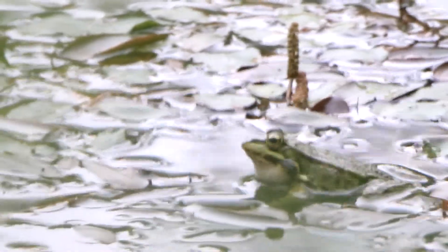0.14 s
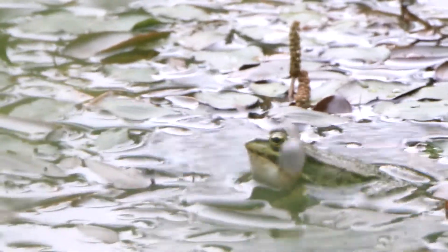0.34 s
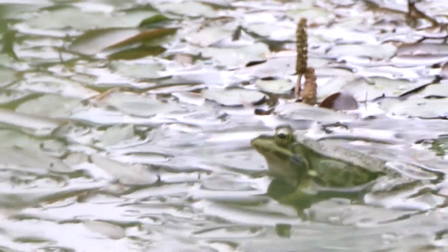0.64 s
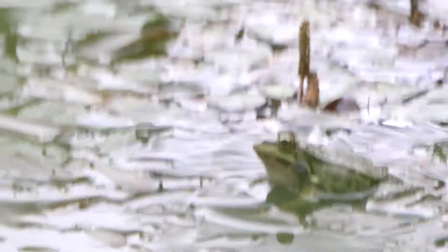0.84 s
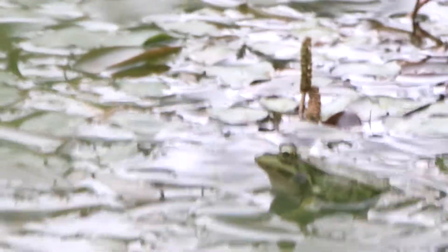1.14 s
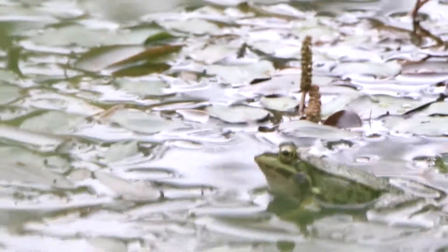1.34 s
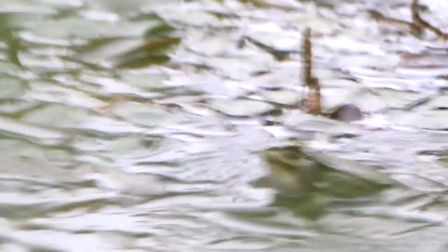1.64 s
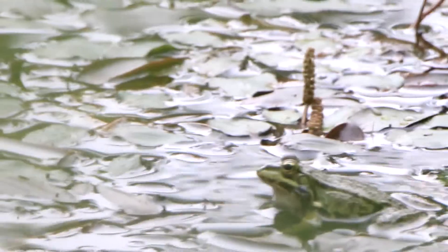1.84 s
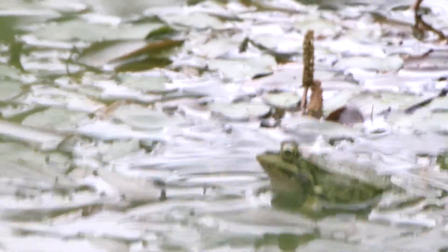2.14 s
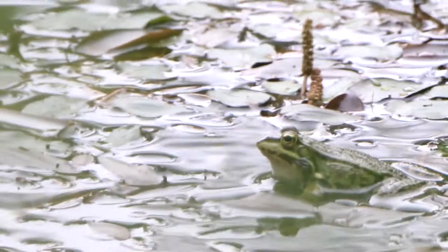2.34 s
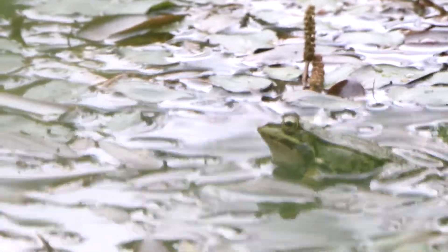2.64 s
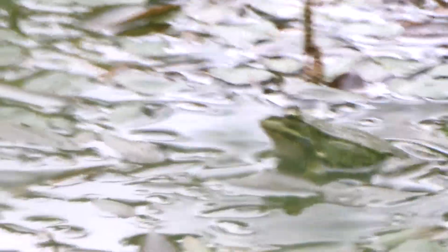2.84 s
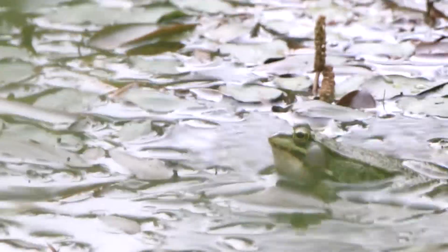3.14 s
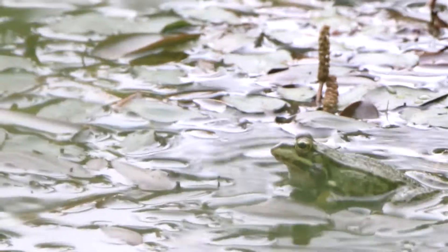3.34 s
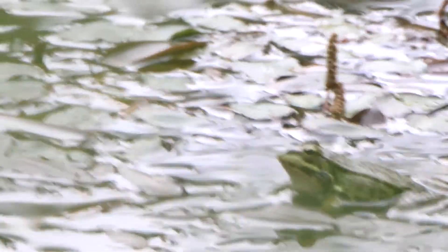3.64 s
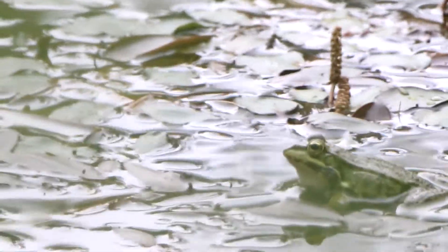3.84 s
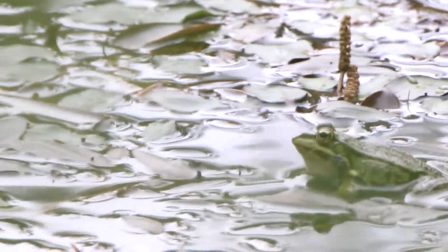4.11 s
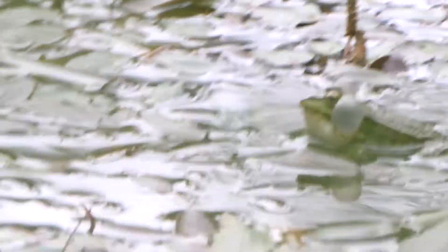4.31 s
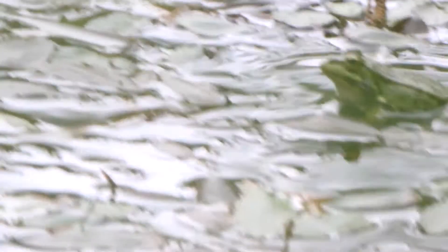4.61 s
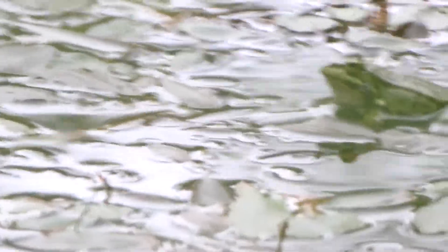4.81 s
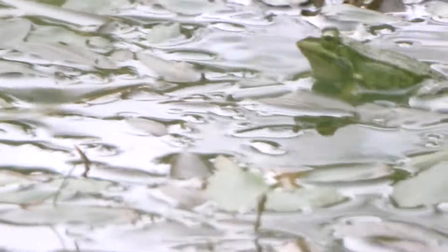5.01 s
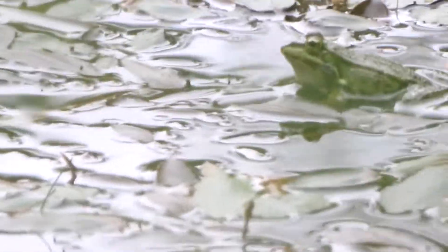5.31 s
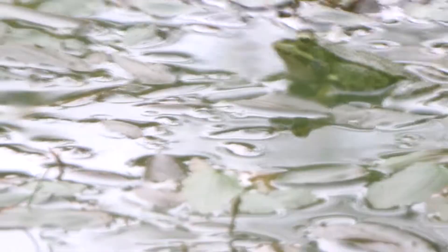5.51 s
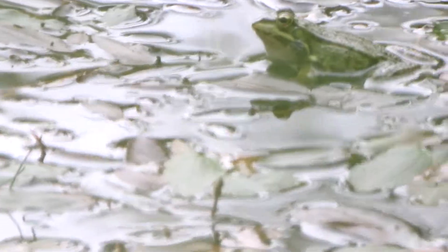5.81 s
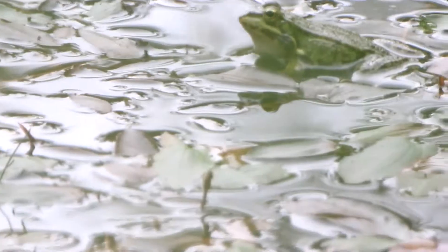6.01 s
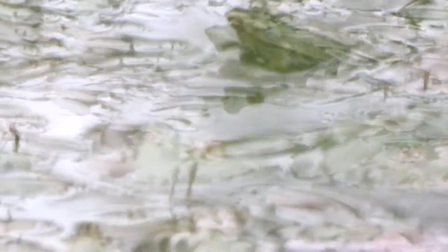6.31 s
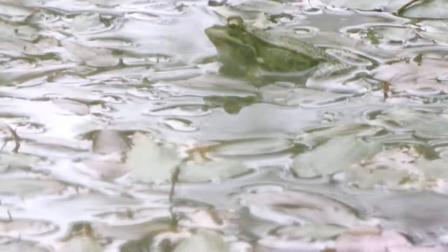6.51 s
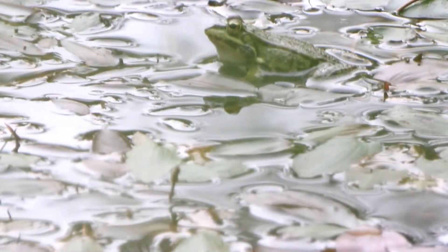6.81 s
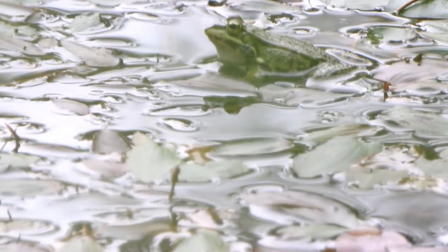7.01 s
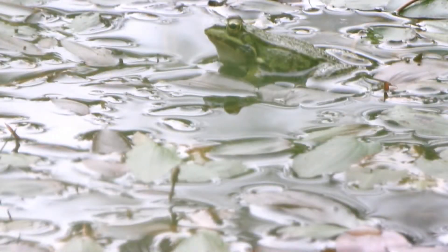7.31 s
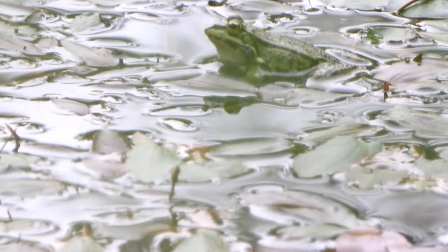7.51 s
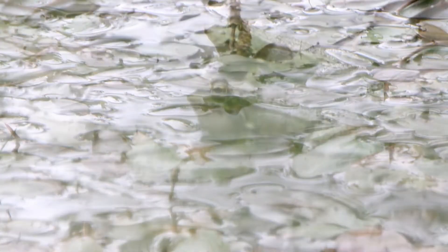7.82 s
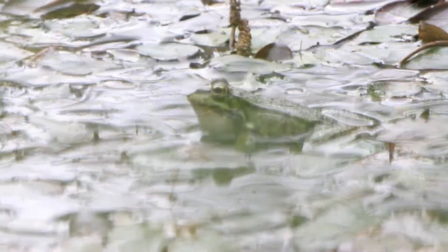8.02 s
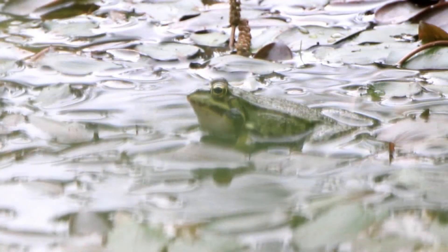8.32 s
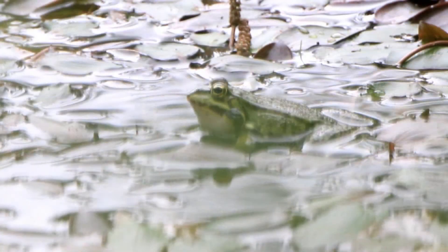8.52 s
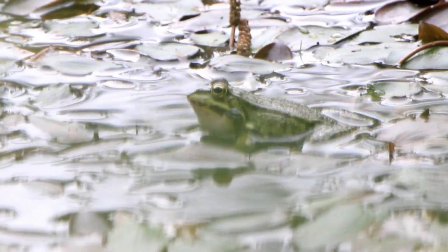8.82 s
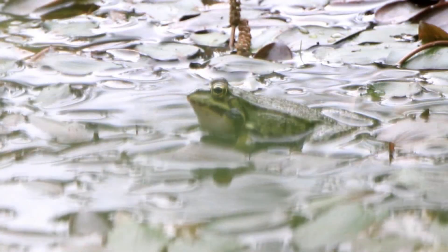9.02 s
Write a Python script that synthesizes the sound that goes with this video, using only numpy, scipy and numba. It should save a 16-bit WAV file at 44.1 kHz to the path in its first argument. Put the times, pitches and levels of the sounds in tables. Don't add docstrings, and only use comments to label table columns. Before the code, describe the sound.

Many green frogs call over each other without pause, fast dry rattles, creaky croaks and short throaty grunts, over a very faint outdoor rumble.

```python
import sys
import numpy as np
from scipy import signal
from scipy.fft import rfft, irfft
from scipy.io import wavfile
from scipy.ndimage import uniform_filter1d
from numba import njit

SR = 44100
rng = np.random.default_rng(int(sys.argv[2]) if len(sys.argv) > 2 else 0)


def generate_wav(signal):
    frames = np.transpose(np.atleast_2d(signal))
    scaled = np.clip(frames, -1, 1) * 32767
    pcm = np.round(scaled).astype(np.int16)
    wavfile.write(sys.argv[1], SR, pcm)


def invert_db(x):
    u = np.asarray(x, float) / 20
    return 10 ** u


N = 403515

# frequency in Hz, level in dB.
AIR = [(20, -41), (60, -12.5), (135, -11.5), (300, -19), (1000, -18), (3600, -27), (8000, -36),
       (16000, -46)]
AIR_RMS_DB = -54
# frequency in Hz, left minus right in dB.
PORTS = [(60, -0.5), (290, -0.2), (850, 0.0), (1440, -0.5), (2440, -2.5), (4140, 1.0), (7030, 3.5)]
# time in seconds, high voices in dB, deep voices in dB.
FAR = [(0.0, -26, -36), (0.43, -21.5, -45.5), (0.61, -34.5, -38), (1.42, -31.5, -48), (1.6, -27.5, -40),
       (1.99, -28, -53), (2.16, -20, -41), (3.1, -28.5, -35), (3.29, -23, -40.5), (4.08, -31, -46),
       (5.12, -28.5, -41), (5.53, -32, -44.5), (6.34, -31.5, -40), (6.93, -27.5, -48.5),
       (7.26, -29.5, -39.5), (7.59, -25.5, -47.5), (8.4, -35.5, -45.5), (9.15, -32.5, -49.5)]
# time in seconds, peak in dB.
TICKS = [
    (3.9762, -42.5),
    (5.0197, -37),
    (5.355, -48.5),
    (5.617, -44),
    (5.768, -52),
    (5.811, -40),
    (5.8185, -43),
    (8.141, -39),
]
# start in seconds, peak in dB.
GRUNTS = [(0.024, -20.5), (0.331, -21.5), (1.21, -29), (1.619, -22), (1.657, -21), (2.261, -29),
          (2.306, -32), (3.155, -32), (3.193, -20), (3.333, -27.5), (3.754, -24), (4.442, -21),
          (4.521, -26), (4.688, -33), (5.726, -19.5), (6.147, -28), (6.639, -34.5), (7.097, -33),
          (7.878, -28), (7.959, -35), (8.277, -24), (8.659, -23), (8.817, -31)]
# first in seconds, last in seconds, peak in dB.
GRUNT_RUNS = [
    (0.673, 0.958, -29.5),
    (5.013, 5.262, -32),
    (5.836, 6.023, -48),
    (6.204, 6.359, -35),
]
GRUNT_GAP_S = .034
# start in seconds, end in seconds, first Hz, last Hz, level in dB.
CROAKS = [(-.05, 0.16, 1830, 1870, -22.5), (1.973, 2.216, 1620, 1790, -22.5),
          (2.719, 2.891, 1780, 1820, -25.5), (3.282, 3.466, 1610, 1770, -27),
          (3.734, 3.883, 2090, 1630, -28), (4.017, 4.136, 1760, 2050, -25.5),
          (4.752, 5.007, 1290, 1800, -33), (5.188, 5.316, 1860, 1830, -24.5),
          (5.676, 5.795, 1480, 1810, -24), (6.039, 6.215, 1780, 1800, -29.5),
          (6.418, 6.573, 1430, 1960, -29), (6.837, 6.969, 1600, 1950, -32.5),
          (7.372, 7.425, 1940, 2370, -22), (7.837, 7.99, 1700, 2050, -30), (8.245, 8.332, 1340, 1740, -24),
          (8.407, 8.481, 1940, 2070, -35.5), (2.96, 3.086, 1870, 1710, -38),
          (8.647, 8.741, 1980, 2070, -26.5), (8.99, 9.207, 1230, 1830, -26)]
# start in seconds, end in seconds, first Hz, last Hz, level in dB.
RINGING_CROAKS = [
    (0.318, 0.484, 1300, 2100, -20.5),
    (1.054, 1.324, 1740, 1976, -27),
    (1.479, 1.789, 1200, 2050, -23.5),
    (3.1, 3.253, 1140, 2170, -23),
    (4.316, 4.487, 1195, 2050, -20),
    (4.455, 4.529, 1560, 2170, -21),
]
CROAK_HEAD_HZ, CROAK_HEAD_DB, PLAIN_HEAD_DB = (6300, 5370), -18.5, -26.5
THROB_S, THROB_DB = .035, 4

# first burst in seconds, last burst in seconds,
# level in dB, full sac in Hz, head ring relative to the sac in dB.
BRIGHT = [
    (-.131, .342, -23, 2430, -9.5),
    (1.203, 1.63, -27.5, 2720, -6),
    (3.218, 3.662, -28, 2506, -8),
    (7.494, 7.93, -26, 2520, -8),
    (8.499, 9.066, -26.5, 2617, -7.5),
]
BIG = [
    (4.796, 5.177, -28, 2280, -10.5),
    (6.92, 7.39, -20, 2433, -11),
]
MELLOW = [
    (2.288, 2.52, -33.5, 2840, -10.5),
    (5.244, 5.528, -30.5, 2120, -13.5),
    (6.45, 6.82, -25, 2190, -15),
    (7.956, 8.388, -23, 2440, -12.5),
]
SLOW = [(2.563, 2.931, -25, 2070, -18.5)]
SMALL = [
    (1.346, 1.83, -43, 3050, 0),
    (4.428, 4.938, -34.5, 2790, -10),
    (6.914, 7.584, -42, 2880, -3),
]
LAZY = [(5.97, 6.454, -31.5, 2660, -16.5)]
QUICK = [
    (.36, .633, -24.5, 2260, -9),
    (1.856, 2.266, -29, 2690, -10.5),
    (3.554, 3.694, -29, 2170, -8.5),
    (3.975, 4.251, -29, 2540, -10.5),
    (5.568, 5.972, -34.5, 2550, -16),
]
LOW = [
    (.135, .325, -31, 1750, -40),
    (1.52, 1.906, -34.5, 1570, -46),
    (2.05, 2.518, -30.5, 1870, -11),
    (4.616, 4.9, -33, 1540, -32),
    (5.684, 5.822, -29, 1940, -36),
]
LOW_QUICK = [
    (6.21, 6.408, -30, 1310, -42),
    (7.428, 7.714, -33, 1690, -41),
    (.78, .965, -46, 1600, -44),
]
HIGH = [
    (.258, .345, -32.5, 2020, 0),
    (3.11, 3.24, -35, 2110, -10),
]
THIN = [(5.995, 6.24, -34.5, 2880, -11)]
EARLY = [(1.076, 1.248, -27, 2400, -9)]
# calls, burst gap in seconds, slowing 0-1, empty sac share of full pitch,
# head first Hz, head last Hz.
FROGS = [(BRIGHT, .0435, .04, .85, 5230, 4900), (BIG, .0472, .04, .78, 5500, 5000),
         (MELLOW, .047, .03, .86, 6050, 5450), (SLOW, .0527, .0, .9, 5950, 5400),
         (SMALL, .0396, .03, .95, 7450, 6880), (LAZY, .0484, .06, .9, 6130, 5750),
         (HIGH, .032, .05, .9, 7700, 6700), (THIN, .04, .03, .95, 7800, 7200),
         (EARLY, .0343, .12, .9, 5450, 5950), (QUICK, .0343, .13, .85, 6520, 5950),
         (LOW, .0473, .07, .88, 4250, 4350), (LOW_QUICK, .039, .1, .8, 4250, 4350)]
SAC_FULL_AT, SAC_SAG = 0.68, 0.067
SWELL_DB, SWELL_S, LAST_DB = -6.5, 0.1, -2
HEAD_SWELL_DB, HEAD_LAST_DB = -6, -2
SCATTER_DB = .8
# start in seconds, end in seconds, ring in Hz, ring t60 in seconds, level re click in dB.
FACING = [
    (7.03, 7.41, 9500, .0005, -12),
    (0, .16, 11800, .003, -32),
    (2.0, 2.28, 13000, .002, -29),
    (8.6, 8.95, 11000, .002, -33),
    (4.13, 4.26, 14000, .003, -38),
]


@njit
def ring(rows, rise_s):
    out = np.zeros((2, N))
    for s, hz, t60, left, right, lag in rows:
        for ch in range(2 if s >= 0 else 0):
            at = (s + lag * ch) * SR
            first = int(np.ceil(at))
            p = np.exp((2j * np.pi * hz - np.log(1000) / t60) / SR)
            z = p ** (first - at) * (right if ch else left)
            q = np.exp(-1 / (rise_s * SR))
            shut = q ** (first - at)
            for i in range(max(first, 0), min(N, first + int(t60 * SR))):
                out[ch, i] += z.imag * (1 - shut)
                z, shut = z * p, shut * q
    return out


def modes(s, hz, t60_s, db, lag_s):
    chance = rng.standard_normal((len(s), 3)).T
    hz = np.clip(hz + 40 * chance[0], 100, 16000)
    port_hz, port_db = np.array(PORTS).T
    pan_db = np.interp(np.log(hz), np.log(port_hz), port_db)
    db = db + 1.2 * chance[1]
    t60_s = t60_s * np.exp(.15 * chance[2])
    left, right = invert_db(db + pan_db / 2), invert_db(db - pan_db / 2)
    return np.column_stack(np.broadcast_arrays(s, hz, t60_s, left, right, lag_s))


def bursts(s, db, gap_s, count):
    chance = rng.standard_normal((len(s), count + 1))
    k = np.arange(count)
    jitter = np.exp(.08 * chance[:, :1] + .06 * chance[:, 1:])
    times = np.cumsum(gap_s * 1.14 ** (k - count + 2) * jitter, axis=1)
    times += s[:, None] - times[:, -3:-1].mean(axis=1, keepdims=True)
    swell_db = -2.6 * np.maximum(count - 3 - k, 0) ** 1.4
    return times.ravel(), (db[:, None] + swell_db).ravel(), np.repeat(np.arange(len(s)), count)


def voice(s, db, hz, lag_s, snap_db, throat_db, head_hz, head_db):
    opposite = [1, 1, 1, -1, -1, 1]
    sac_t60_s = .0095
    return np.vstack([modes(s, hz, sac_t60_s, db, lag_s),
                      modes(s, 0.66 * hz, sac_t60_s / 2, db - 10.0, lag_s),
                      modes(s, 663, .014, db + throat_db, lag_s),
                      modes(s, 4040, .003, db + snap_db, lag_s) * opposite,
                      modes(s, head_hz, .010, db + head_db, lag_s)])


def air():
    hz = np.maximum(np.arange(N // 2 + 1) * SR / N, 10)
    air_hz, air_db = np.array(AIR).T
    shape = invert_db(np.interp(np.log(hz), np.log(air_hz), air_db))
    mid, side = rfft(rng.standard_normal((2, N)))
    side = side * np.clip(.4 + hz / 9000, 0, 1)
    noise = irfft(shape * np.array([mid + side, mid - side]), N)
    return noise * invert_db(AIR_RMS_DB) / noise.std()


def echoes(near):
    t = np.arange(SR // 3) / SR
    banks = rng.standard_normal((2, len(t))) * invert_db(-60 * t / .16) * (t > .003)
    banks = signal.lfilter([1], [1, -.2], banks)
    return invert_db(-34.5) * signal.fftconvolve(near.mean(axis=0)[None], banks, axes=1)[:, :N]


def chorus():
    s, db, throat_db = np.transpose(FAR)
    near_s = calls()[0]
    rows = []
    for rate_hz, hz, size_db in (21.51, 2096, 17.9), (23.88, 1692, 12.1), (19.02, 1200, 8.8), (22.78, 2697, 4.8):
        chance = rng.standard_normal((240, 3)).T
        t = np.cumsum(np.exp(0.076 * chance[0]) / rate_hz)
        lead = near_s[np.abs(t[:, None] - near_s).argmin(axis=1)]
        t = np.where(abs(lead - t) < .028, lead + .005 * chance[0], t)
        t, click_db, k = bursts(t, size_db + 0.51 * chance[1], .0046, count=7)
        lag_s = (5.1 + 2.42 * chance[2][k]) / SR
        far_hz = hz * np.exp(0.061 * chance[2][k])
        rows.append(modes(t, far_hz, 0.0051, click_db + np.interp(t, s, db), lag_s))
    for rate_hz, hz in (26.84, 660), (22.89, 707):
        chance = rng.standard_normal((280, 2)).T
        t = np.cumsum(np.exp(0.13 * chance[0]) / rate_hz)
        t, click_db, k = bursts(t, 0.32 * chance[1], .0075, count=3)
        click_db = click_db + np.interp(t, s, throat_db) + 9.5
        rows.append(modes(t, hz, .015, click_db, 2.5 / SR))
        rows.append(modes(t, 1.7 * hz, .005, click_db, 2.5 / SR))
    return np.vstack(rows)


def water():
    age_s = np.clip(np.arange(N) / SR - 1.03, 0, .05)
    chirp = np.sin(2 * np.pi * (2800 * age_s + 26000 * age_s ** 2))
    return invert_db(-35) * chirp * np.tanh(age_s / .002) * np.exp(-(age_s / .009) ** 2)


def ticks():
    s, db = np.transpose(TICKS)
    return modes(s, 9700, 0.00083, db + 14, 0)


def grunts():
    events = list(GRUNTS)
    for first, last, db in GRUNT_RUNS:
        count = round((last - first) / GRUNT_GAP_S) + 1
        events += [(s, db) for s in np.linspace(first, last, count)]
    s, db = np.transpose(events)
    hz = 580 * np.exp(0.15 * rng.standard_normal(len(s)))
    t, click_db, k = bursts(s + 0.0037, db + 3.0, 0.0083, count=3)
    return np.vstack([modes(t, hz[k], .013, click_db, 2.5 / SR),
                      modes(t, 1100, 0.005, click_db + 4.5, 2.5 / SR),
                      modes(t, 2000, .004, click_db - 3, 2.5 / SR)])


def croaks():
    rows = []
    plain = [(*c, PLAIN_HEAD_DB) for c in CROAKS]
    ringing = [(*c, CROAK_HEAD_DB) for c in RINGING_CROAKS]
    for start, end, first_hz, last_hz, db, head_db in plain + ringing:
        chance = rng.standard_normal((120, 2)).T
        t = start + np.cumsum(np.exp(0.0862 * chance[0]) / 290)
        on = t < end
        age = (t[on] - start) / (end - start)
        swell_db = 14 * np.log10(np.sin(np.pi * age ** 1.6) + .14)
        swell_db = swell_db + 3 * uniform_filter1d(chance[1], size=4)[on]
        swell_db = swell_db + THROB_DB * np.cos(2 * np.pi * (1 - age) * (end - start) / THROB_S)
        hz = first_hz + (last_hz - first_hz) * age
        rows.append(voice(t[on], db + 10.5 + swell_db, hz, np.full(len(hz), 3.0 / SR),
                          snap_db=-29.5, throat_db=-18.5,
                          head_hz=np.interp(age, [0, 1], CROAK_HEAD_HZ),
                          head_db=head_db - 4 * (1 - age) ** 2))
    return np.vstack(rows)


def calls():
    rows = []
    for table, gap_s, slowing, empty, first_hz, last_hz in FROGS:
        for first, last, db, sac_hz, head_db in table:
            age = np.linspace(0, 1, round((last - first) / gap_s) + 1)
            s = first + (last - first) * (age + slowing * age * (age - 1))
            young = np.exp(-((s - first) / SWELL_S) ** 2)
            level_db = db + SWELL_DB * young + LAST_DB * age ** 10
            loss = np.interp(age, [0, SAC_FULL_AT, 1], [1 - empty, 0, SAC_SAG])
            most = np.where(age < SAC_FULL_AT, 1 - empty, SAC_SAG)
            sac = sac_hz * (1 - loss ** 2 / most)
            head = first_hz + (last_hz - first_hz) * age ** .7
            ring_db = head_db + HEAD_SWELL_DB * young + HEAD_LAST_DB * age ** 6
            rows.append(np.column_stack([s, level_db, sac, head, ring_db]))
    rows = np.vstack(rows)
    return rows[rows[:, 0] > -.02].T


def rattles():
    s, db, hz, head_hz, head_db = calls()
    chance = rng.standard_normal((len(s), 3)).T
    lag_s = (2.6 + .3 * chance[0]) / SR
    t, click_db, k = bursts(s + .001, db + 14.5 + SCATTER_DB * chance[1], .0040, count=7)
    hz = hz * (1 + .015 * chance[2])
    tops = []
    for start, end, top_hz, t60_s, top_db in FACING:
        on = (t > start) & (t < end) & (db[k] > -32)
        tops.append(modes(t[on], top_hz, t60_s, click_db[on] + top_db, lag_s[k][on]))
    voices = voice(t, click_db, hz[k], lag_s[k], snap_db=-16.5, throat_db=-23.5,
                   head_hz=head_hz[k], head_db=head_db[k])
    return voices, np.vstack(tops)


def scene():
    rise_s = .0002
    rattle, tops = rattles()
    near = ring(np.vstack([rattle, grunts(), croaks()]), rise_s)
    near = near + ring(chorus(), 2 * rise_s) + water()
    near = signal.sosfilt(signal.butter(3, 8300, fs=SR, output="sos"), near)
    near = near + ring(np.vstack([tops, ticks()]), rise_s)
    near = signal.sosfilt(signal.cheby1(6, .5, 510, "high", fs=SR, output="sos"), near)
    return near + echoes(near) + air()


def top_cut(x):
    return signal.sosfilt(signal.butter(12, 15830, fs=SR, output="sos"), x)


def record(dry):
    return top_cut(dry)


dry = scene()
out = record(dry)
generate_wav(out)
```